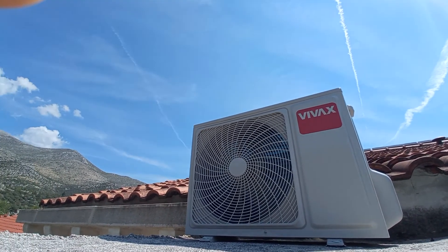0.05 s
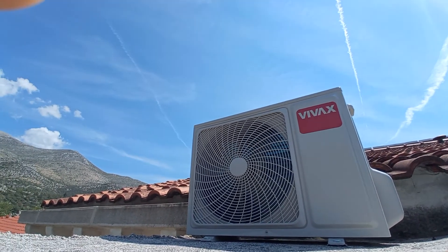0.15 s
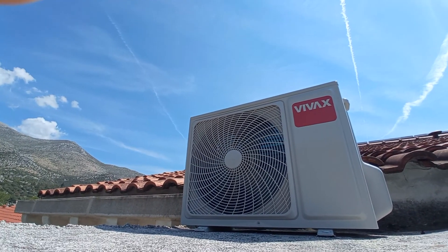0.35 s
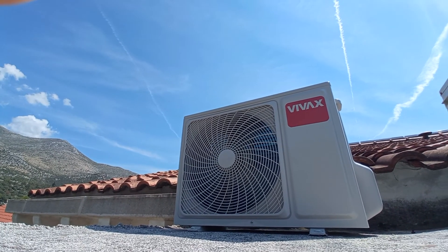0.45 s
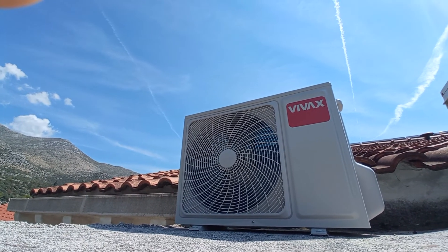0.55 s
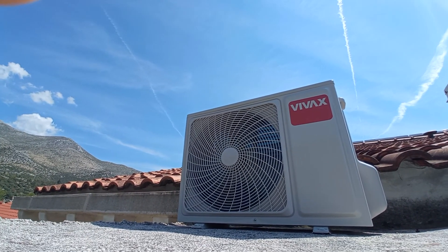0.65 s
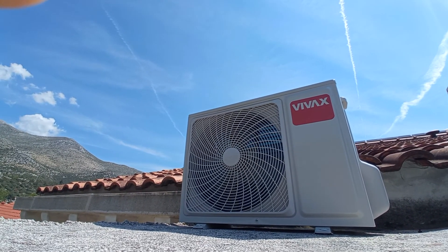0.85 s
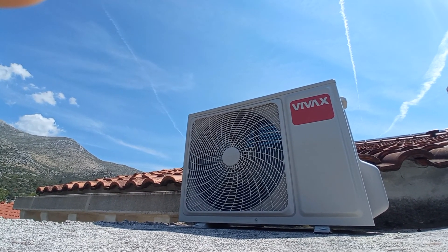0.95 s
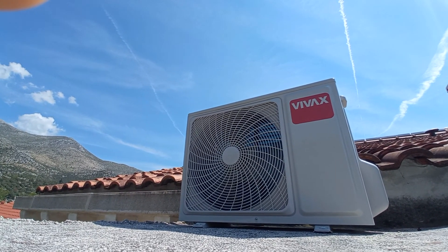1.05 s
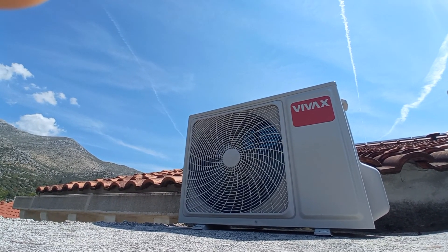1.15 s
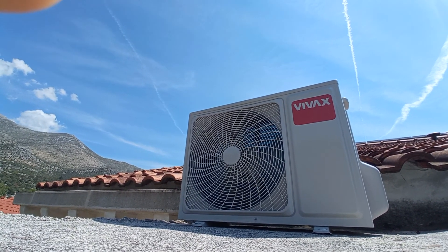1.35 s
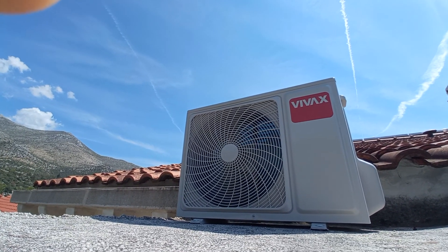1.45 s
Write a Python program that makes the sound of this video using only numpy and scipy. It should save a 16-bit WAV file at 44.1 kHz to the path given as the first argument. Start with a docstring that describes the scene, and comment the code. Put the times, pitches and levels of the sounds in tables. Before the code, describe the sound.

A rooftop air conditioner runs with a faint fan hum, rushing air and thin hiss. A much louder finger rub crosses the microphone, ending in a clicking pop, then the hum continues under light buffeting and grip scuffs.

```python
"""An outdoor air conditioner hums and hisses faintly throughout, beside a hand-held camera:
its fan and compressor hum, air rushes through its grille and its pipes hiss.
From about 0.2 s a finger rubs its way over the microphone port (the small hole for sound).
Near 0.4 s it seals the port with soft thumps, lets go with a pop and slides off.
Afterwards come soft low buffets, as of wind or handling, and the grip gives a few tiny scuffs."""
import sys
import numpy as np
from scipy import signal
from scipy.fft import rfft, irfft
from scipy.io import wavfile

SR = 44100
rng = np.random.default_rng(int(sys.argv[2]) if len(sys.argv) > 2 else 0)


def wrap_up_sound(samples):
    """Save the sound to the file named by the first command line argument, as 16-bit audio."""
    columns = np.atleast_2d(samples).T
    # keep every value between -1 and 1, then stretch to whole-number steps
    tamed = np.clip(columns, -1, 1)
    steps = np.round(tamed * 32767).astype(np.int16)
    wavfile.write(sys.argv[1], SR, steps)


N = 66150
T = np.arange(N) / SR


def amp(db):
    """Turns decibels into a factor to multiply by."""
    return 10 ** (np.asarray(db) / 20)


def unit(x):
    """Scales a signal to an average strength (rms) of 1."""
    return x / np.sqrt(np.mean(x ** 2) + 1e-20)


def colour(points, hz):
    """Gain at the frequencies hz, read from a curve of (f/Hz, level/dB) points."""
    f, db = np.transpose(points)
    return amp(np.interp(np.log(hz + 1), np.log(f + 1), db))


def noise(points):
    """Noise of strength 1; the points set only the balance of low and high."""
    gain = colour(points, np.fft.rfftfreq(N, 1 / SR))
    return unit(irfft(rfft(rng.standard_normal(N)) * gain, N))


def band(hz, width_hz):
    """Noise around one frequency; around zero it is a slow wander."""
    f = np.fft.rfftfreq(N, 1 / SR)
    bell = np.exp(-2 * ((f - hz) / width_hz) ** 2)
    return unit(irfft(rfft(rng.standard_normal(N)) * bell, N))


def flutter(depth_db, rate_hz):
    """A gain that makes loudness waver at random."""
    return unit(amp(2 * depth_db * np.tanh(band(0, rate_hz) / 2)))


def ripple(x, depth_db, spacing_hz):
    """Gives a sound many close, steady peaks and dips, scattered from low to high."""
    hz = np.fft.rfftfreq(N, 1 / SR)
    heights = rng.standard_normal(len(hz))
    gain = amp(depth_db * np.interp(hz / spacing_hz, np.arange(len(hz)), heights))
    return unit(irfft(rfft(x) * gain, N))


def hum(fan_hz=52.5, wander=0.00301, compressor_hz=88):
    """The fan sounds at multiples of its drifting turning rate, over the compressor's drone."""
    # tones of the fan: multiple of the turning rate, level/dB
    fan_tones = [(3, -68), (4, -67.5), (5, -65), (6, -63.5), (7, -66), (8, -85), (11, -70), (12, -72.5),
                 (13, -81), (15, -81), (20, -91), (21, -78)]
    turns = np.cumsum(fan_hz * (1 + wander * band(0, 8))) / SR
    fan = np.zeros(N)
    for multiple, db in fan_tones:
        tone = np.sin(2 * np.pi * (multiple * turns + rng.random()))
        fan += amp(db) * unit(tone * flutter(depth_db=4.5, rate_hz=13))
    drone = np.sin(2 * np.pi * compressor_hz * T + .5 * band(0, 6.6))
    return fan + amp(-65) * unit(drone)


def air():
    """Air rushes through the grille with a low, uneven noise."""
    # tone colour of the rush: f/Hz, relative level/dB
    rush = [(20, -28), (40, -10), (70, -6), (115, 0), (280, -3), (430, -9), (700, -7), (1100, -13.5),
            (1500, -19.5), (2000, -25.5), (2600, -24.5), (3200, -45), (16000, -54)]
    return amp(-54.5) * noise(rush) * flutter(depth_db=2, rate_hz=24)


def pipes():
    """The pipework hisses and rings, with a thin sizzle at the very top."""
    # where the pipes ring: f/Hz, width/Hz, level/dB
    resonances = [(3900, 200, -82.5), (4200, 123, -81), (4835, 79, -72.5), (6400, 490, -73),
                  (6650, 220, -76), (8540, 100, -82.5), (9050, 590, -76), (11600, 500, -83.5),
                  (12500, 136, -87), (12600, 350, -83)]
    # tone colour of the hiss: f/Hz, relative level/dB
    hiss_colour = [(20, -61), (3300, -30), (4500, -7), (5100, 0.5), (6800, 3.5), (7200, -5), (9100, -12),
                   (10200, -13), (12900, -17), (13700, -26), (14500, -14), (16000, -12.5)]
    # rise and fall of hiss and ringing: t/s, gain/dB
    flow_curve = [(0, -4.5), (.17, -2.5), (.5, 0), (.8, 0), (1.1, 0.5), (1.25, -1), (1.5, 0)]
    # loudness of the sizzle: t/s, level/dB
    sizzle_curve = [(0, -66), (.07, -85), (.17, -80), (.5, -90), (.65, -70), (1.08, -69.5), (1.17, -83),
                    (1.5, -92)]
    ringing = sum(amp(db) * band(hz, width) for hz, width, db in resonances)
    hiss = amp(-64.5) * ripple(noise(hiss_colour), depth_db=2.9, spacing_hz=69.6)
    flow = amp(np.interp(T, *np.transpose(flow_curve))) * flutter(depth_db=0.9, rate_hz=22)
    sizzle = ripple(band(hz=15100, width_hz=700), depth_db=5, spacing_hz=50)
    sizzle_level = amp(np.interp(T, *np.transpose(sizzle_curve)))
    return (ringing + hiss) * flow + sizzle * sizzle_level


def buffets(hz=84.2, width_s=0.017):
    """Soft low buffets, as of wind or handling, swell and fade unevenly."""
    # tops of the buffets: t/s, level/dB
    peaks = [(.55, -52), (.625, -49), (.76, -51.5), (.95, -52.5), (1.155, -51), (1.27, -51), (1.365, -60)]
    level = sum(amp(db) * np.exp(-((T - s) / width_s) ** 2 / 2) for s, db in peaks)
    return level * unit(np.sin(2 * np.pi * hz * T + 1.24 * band(0, 41)))


def scuffs():
    """The gripping hand brushes the case: each touch is a short fizz with a duller body."""
    # light brushes: t/s, rise/s, decay/s, fizz level/dB, body level/dB
    brushes = [(0.708, .001, 0.015, -51.5, -58), (0.8345, 0.00033, 0.0027, -56, -52),
               (1.088, .001, 0.0013, -50.5, -70), (1.387, 0.0046, 0.008, -51.5, -48),
               (1.473, 0.0017, .003, -65, -52)]
    # tone colour of the bright part: f/Hz, relative level/dB
    fizz_colour = [(20, -30), (1000, 3), (2500, 4), (4200, 2), (6500, 11.5), (8000, 0), (12000, -43),
                   (16000, -27)]
    # tone colour of the dull part: f/Hz, relative level/dB
    body_colour = [(20, -32), (300, -2), (650, 6), (1200, -2), (2000, -2.5), (2800, -30), (8000, -33),
                   (16000, -66)]
    fizz, body, out = noise(fizz_colour), noise(body_colour), np.zeros(N)
    for s, rise, decay, fizz_db, body_db in brushes:
        envelope = np.exp(-np.maximum((s - T) / rise, (T - s) / decay))
        out += envelope * (amp(fizz_db) * fizz + amp(body_db) * body)
    return out * flutter(depth_db=1.5, rate_hz=420)


def slide():
    """Skin slides across the case: a dry swish at light touch, then a rub over a rumble."""
    # the finger's stroke: t/s, rub level/dB, rumble level/dB, swish level/dB
    stroke = [(.17, -88, -89, -82), (.2, -53.5, -48.5, -57.5), (.23, -42.5, -49, -49),
              (.244, -30, -26, -48.5), (.263, -30.5, -35.5, -59), (.292, -35, -36, -91),
              (0.314, -35, -42, -54.5), (.35, -37.5, -46, -64), (.362, -30.5, -35, -71),
              (.399, -33, -48, -70), (.404, -65.5, -33, -83), (.442, -55, -56, -91),
              (.449, -34.5, -31, -92), (.474, -43, -69, -68), (.495, -49.5, -57, -55), (.52, -88, -70, -86)]
    # tone colour of rubbing skin: f/Hz, relative level/dB
    rub = [(20, -55), (150, -1), (300, -1), (650, -1), (1000, -2.5), (1500, -5), (2200, -12), (3000, -21),
           (4200, -30.5), (6500, -58), (7600, -61), (16000, -66)]
    # tone colour of the low rumble: f/Hz, relative level/dB
    rumble = [(20, -45), (55, -4), (95, 3), (160, -4.5), (300, -6.5), (500, -17), (2000, -61)]
    # tone colour of the dry swish: f/Hz, relative level/dB
    swish = [(20, -23), (1000, -28), (2500, 3.5), (4200, 0), (6200, -2), (8000, -18), (12000, -18.5),
             (16000, -35)]
    times, *levels = np.transpose(stroke)
    rub_gain, rumble_gain, swish_gain = (amp(np.interp(T, times, db)) for db in levels)
    return rub_gain * noise(rub) + rumble_gain * noise(rumble) + swish_gain * noise(swish)


def gate(start_s, end_s, rise_s, fall_s):
    """A smooth switch that goes from 0 to 1 and back."""
    return (1 + np.tanh((T - start_s) / rise_s)) * (1 - np.tanh((T - end_s) / fall_s)) / 4


def gap():
    """The narrowing gap under the finger rasps hollowly just before the port closes."""
    narrow = gate(start_s=.357, end_s=.396, rise_s=0.0061, fall_s=0.0061)
    return amp(-26.5) * narrow * band(hz=744, width_hz=1000)


def port(sealed_db=-20.5):
    """The share of outside sound that gets past the finger into the port."""
    covered = gate(start_s=0.412, end_s=.484, rise_s=0.02, fall_s=0.0036)
    return amp(sealed_db * covered)


def cracks(size=2048):
    """Suction makes sharp clicks, coloured by the port, as the seal gives and breaks."""
    # suction clicks: t/s, peak level/dB, dull above f/Hz
    clicks = [(0.4277, -33, 2730), (.4416, -13.5, 20300)]
    # tone colour of a click: f/Hz, relative level/dB
    click_colour = [(20, -9), (500, 12), (1200, 14), (2000, -1), (2600, 3), (3500, -3), (4100, -16.5),
                    (5100, -8.5), (6500, -17), (8500, -35), (16000, -46)]
    hz, out = abs(np.fft.fftfreq(size, 1 / SR)), np.zeros(N)
    for s, db, dull_hz in clicks:
        log_gain = np.log(colour(click_colour, hz) / np.sqrt(1 + (hz / dull_hz) ** 8))
        # pack this colour into a click with the most sudden start (minimum phase)
        spectrum = np.exp(np.conj(signal.hilbert(log_gain)))
        click = np.fft.ifft(spectrum).real
        click /= abs(click).max()
        out -= amp(db) * np.interp(T - s, np.arange(size) / SR, click, left=0, right=0)
    return out


def pops():
    """Trapped air thumps and skin snaps as the finger presses and lifts."""
    # pressure thumps in the covered port: t/s, gain/dB, f/Hz, decay/s, rise/s
    thumps = [(.2585, -15, 156, 0.0047, 0.00054), (0.314, -21.5, 79, .009, 0.0017),
              (0.3999, -9, 114, 0.0051, 0.0029), (0.4297, -6, 160, 0.002, 0.00045),
              (0.4407, 0, 256, 0.0022, 0.0015), (0.45, -30, 88, 0.0072, 0.0018),
              (.504, -36, 147, 0.0059, 0.0018)]
    # skin snapping on and off the port: t/s, peak level/dB, width/s
    snaps = [(.4004, -24, 0.00041), (0.4298, -15.5, 0.00044), (0.4413, -30, 0.00042)]
    out = np.zeros(N)
    for s, db, hz, decay, rise in thumps:
        age = np.maximum(T - s, 0)
        envelope = (1 - np.exp(-age / rise)) * np.exp(-age / decay)
        out -= amp(db) * envelope * np.sin(2 * np.pi * hz * age)
    for s, db, width in snaps:
        offset = (T - s) / width
        out -= amp(db) * offset * np.exp((1 - offset ** 2) / 2)  # one push, then one pull
    return out


def scene():
    """The air conditioner and buffets, heard past the finger, plus the sounds of the hand."""
    conditioner = hum() + air() + pipes()
    background = (conditioner + buffets()) * port()
    return (background + slide() + gap() + scuffs() + pops() + cracks())[None]


def record(dry, low_cut_hz=65.5, high_cut_hz=15900):
    """The microphone weakens the deepest bass and cuts off the highest treble."""
    low_cut = signal.butter(2, low_cut_hz, "high", fs=SR, output="sos")
    high_cut = signal.firwin(511, high_cut_hz, window=("kaiser", 9), fs=SR)
    return signal.oaconvolve(signal.sosfilt(low_cut, dry), high_cut[None], "same")


dry = scene()
out = record(dry)
wrap_up_sound(out)
```